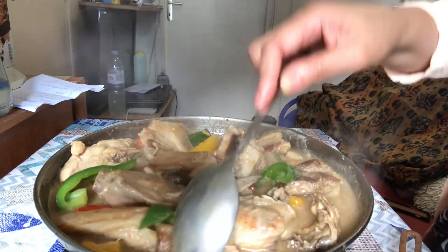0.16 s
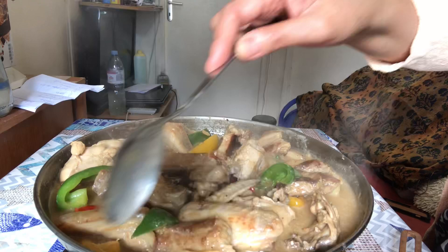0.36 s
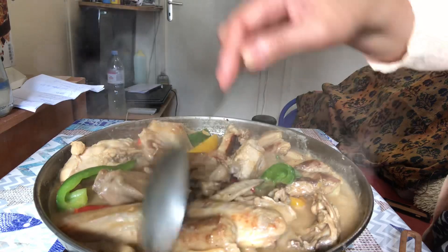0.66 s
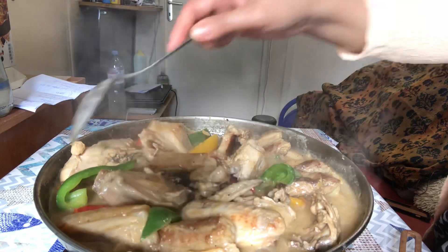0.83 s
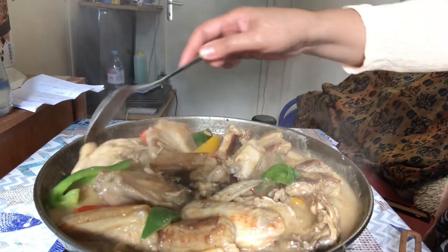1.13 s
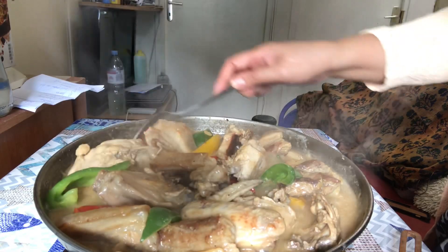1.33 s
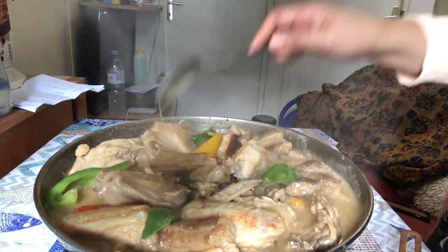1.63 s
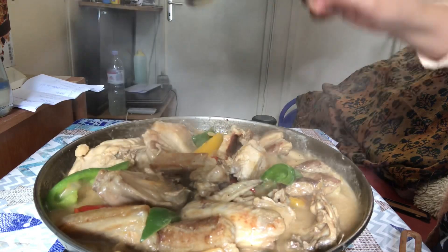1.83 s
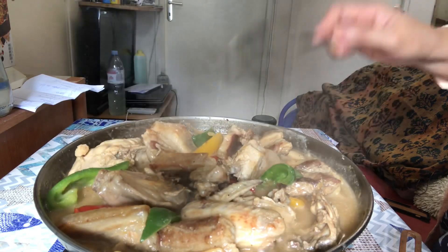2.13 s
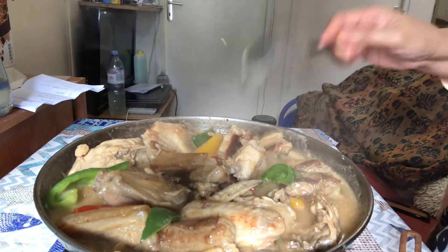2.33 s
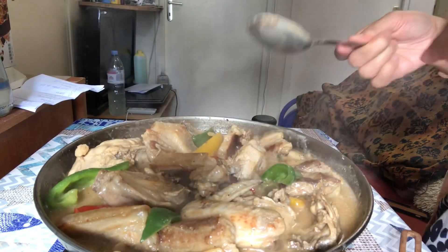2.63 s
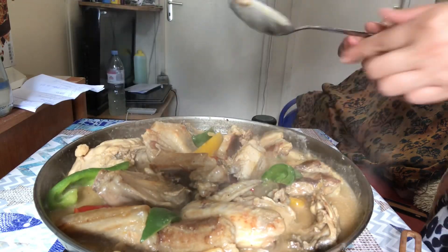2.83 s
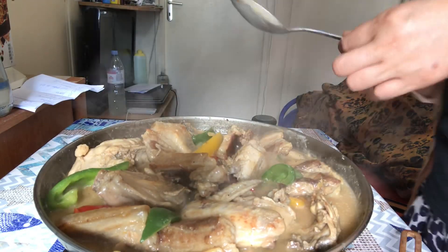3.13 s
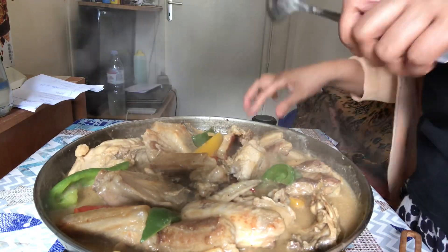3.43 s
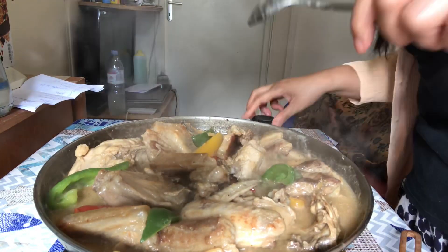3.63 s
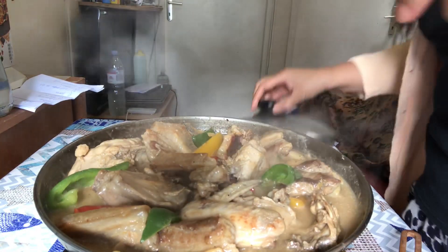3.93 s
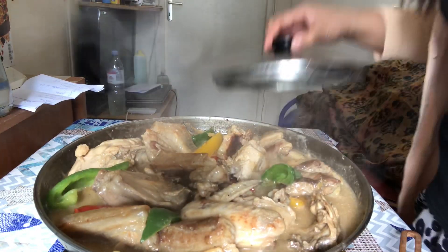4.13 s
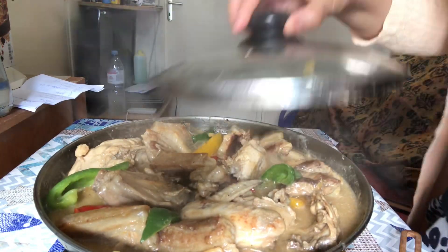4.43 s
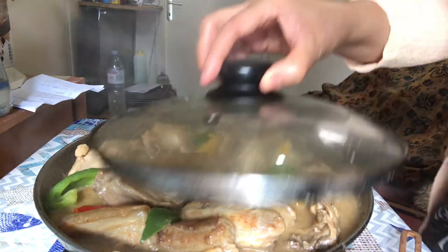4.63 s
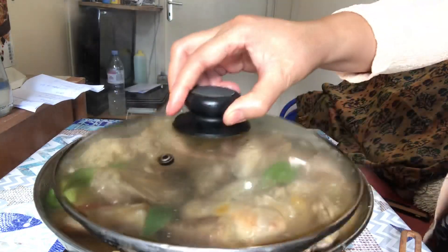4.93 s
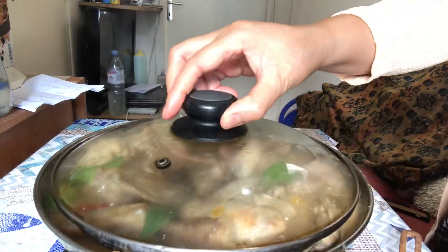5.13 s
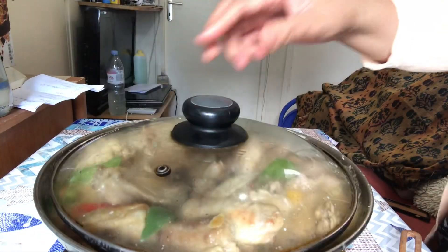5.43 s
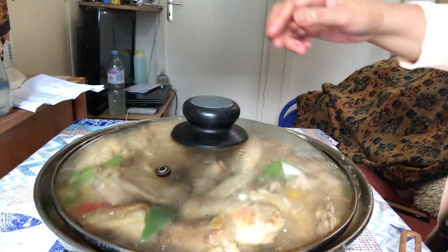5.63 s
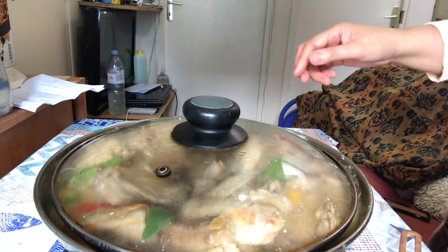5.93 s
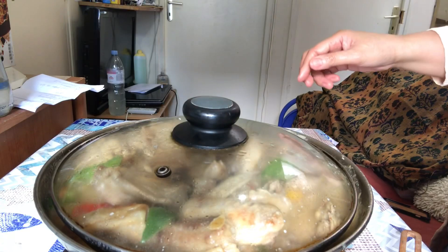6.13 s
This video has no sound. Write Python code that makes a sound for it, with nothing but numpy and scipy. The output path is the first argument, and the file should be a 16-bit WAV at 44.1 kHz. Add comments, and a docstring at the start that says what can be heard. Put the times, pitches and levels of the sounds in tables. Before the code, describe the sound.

Thick stew bubbles and pops close by in a wide metal pan; a spoon scrapes, a lid clanks on, and finally a spoon clatters down.

```python
"""Stew simmering under a lid

A stew simmers close by in a wide metal pan: short swells of tone pop over a low gurgle of resonated noise.
A spoon knocks and scrapes the rim: decaying sines, then noise rubbed through the rim modes.
A glass lid lands with a ring and a rattle; the air space under it resonates with the boil and sinks in pitch.
At the end the spoon drops on a table, ringing over a thud and a clatter. Faint room echo and hiss lie behind.
"""
import sys
import numpy as np
from scipy import signal
from scipy.fft import rfft, irfft
from scipy.io import wavfile
from scipy.ndimage import uniform_filter1d

SR = 44100
rng = np.random.default_rng(int(sys.argv[2]) if len(sys.argv) > 2 else 0)


def store_pcm(level_fs):
    """Save levels as 16-bit WAV."""
    pcm = np.round(np.clip(level_fs, -1, 1) * 32767).astype(np.int16)
    wavfile.write(sys.argv[1], SR, np.atleast_2d(pcm).T)


N = 276507

# clearest bubbles and ticks, among them a loud tick at 4.178 s, probably the lid being lifted: (time [s],
# nominal level [dB], nominal pitch [Hz])
POPS_AND_TICKS = [(0.0517, -34, 3130), (0.0564, -34, 11200), (0.0746, -31.5, 5700), (0.0856, -39, 9540),
                  (0.092, -40.5, 1100), (0.14, -38, 1130), (0.149, -26, 4030), (0.165, -34, 3280),
                  (0.2674, -34.5, 3700), (0.331, -39.5, 7650), (0.341, -38, 1200), (0.4187, -32.5, 3580),
                  (0.447, -36.5, 840), (0.4655, -31, 3370), (0.4963, -32, 5630), (0.5015, -26, 3660),
                  (0.5392, -26.5, 12260), (0.5703, -34, 3930), (0.595, -43.5, 1100), (0.633, -37, 3550),
                  (0.758, -39, 770), (0.7973, -28.5, 3370), (0.827, -35, 7440), (0.8566, -21, 4800),
                  (0.866, -26, 11550), (1.0196, -32, 3120), (1.108, -33.5, 2840), (1.116, -27.5, 3520),
                  (1.172, -27.5, 3340), (1.211, -36.5, 930), (1.319, -27.5, 4030), (1.546, -30, 5460),
                  (1.561, -40, 1070), (1.6205, -25, 5970), (1.636, -40.5, 517), (1.6771, -26, 3000),
                  (1.7287, -34, 3000), (1.742, -26.5, 3320), (1.7656, -34.5, 740), (1.7797, -26, 6800),
                  (1.8498, -28, 3530), (1.9105, -27.5, 6360), (1.926, -30, 5000), (2.0805, -34, 3920),
                  (2.096, -35, 13000), (2.113, -31, 6130), (2.1876, -33, 3120), (2.1991, -30, 7960),
                  (2.2448, -31.5, 5100), (2.406, -30.5, 3430), (2.418, -30.5, 5530), (2.4504, -29.5, 2900),
                  (2.4729, -35.5, 7850), (2.5246, -35, 11550), (2.544, -29.5, 3100), (2.7478, -33.5, 2850),
                  (2.8312, -29.5, 3040), (2.8316, -39, 13100), (2.84, -32, 2940), (2.9379, -43, 3450),
                  (2.9697, -35, 4950), (2.995, -31.5, 3450), (3.0588, -41, 5800), (3.1492, -36, 5950),
                  (3.1552, -32.5, 3800), (3.173, -30.5, 3500), (3.2738, -41, 8700), (3.5626, -33, 4000),
                  (3.611, -37, 3470), (3.673, -31, 2820), (3.8898, -36.5, 1080), (3.943, -30, 3280),
                  (3.9627, -34.5, 10890), (4.1108, -32, 3380), (4.158, -38, 4300), (4.178, -14.5, 3500),
                  (4.182, -21.5, 4400), (4.1974, -27, 2850), (4.221, -32, 4220), (4.2278, -29, 1870),
                  (4.319, -34, 3350), (4.4465, -34.5, 3240), (4.4914, -35, 7100), (4.5487, -33, 6300),
                  (4.5966, -30.5, 980), (4.656, -27, 3450), (4.8447, -29, 3200), (4.908, -29, 940),
                  (5.0382, -34, 2650), (5.1833, -43, 650), (5.1962, -37, 10100), (5.1985, -37, 620),
                  (5.2496, -35.5, 2260), (5.2912, -35.5, 5330), (5.365, -34, 2740), (5.4015, -40, 560),
                  (5.4657, -38, 905), (5.518, -38, 1240), (5.6359, -40, 8110), (5.6963, -39, 2080),
                  (5.81, -39, 2800), (6.05, -40, 1200)]
# vigour of the boil: (time [s], level [dB])
BOIL_VIGOUR = [(0, 3.5), (0.25, -2), (0.65, -1), (0.85, 1.5), (1.4, 1.5), (1.75, 1.5), (2.0, -1.5),
               (2.98, 2), (3.4, -1.5), (3.75, 1.5), (4.25, 1), (4.7, 2.5), (5.4, 0), (6.27, -3)]
# bright bubbles, size by pitch: (pitch [Hz], relative level [dB])
BRIGHT_SIZES = [(1500, -46), (2400, -1.5), (3400, 3.5), (5000, -6), (6700, -4.5), (9000, -37.5),
                (11000, -44), (13000, -39), (16000, -42)]
# fat bubbles: (pitch [Hz], relative level [dB])
FAT_SIZES = [(350, -51), (600, -1.5), (900, 2.5), (1250, -0.5), (1700, -6.5), (2300, -10.5)]
# sparse tiny droplets bursting: (pitch [Hz], relative level [dB])
DROPLET_SIZES = [(7000, -4), (10500, -2), (15000, -0.5)]
# pan floor under the boil: (frequency [Hz], width before broadening [Hz], relative level [dB])
PAN_FLOOR_MODES = [(240.8, 95.4, 4), (289.3, 29, -1), (161, 56, -11.5)]
# bright, fat, droplets, gurgle, rumble: (level [dB], share of vigour followed [1], change under the lid [dB])
BOIL_LAYERS = [(-54.5, 0.84, -1), (-56, 0.47, 0.4), (-68.5, 0.85, -7), (-56.5, 0.88, 1.8), (-63.5, 0.4, 1)]
# higher air modes under the lid: (frequency [Hz], width before broadening [Hz], level [dB])
LID_AIR_MODES = [(1203, 111, -4.5), (1835, 98, -8), (2250, 350, -17.5), (2800, 130, -18.5)]
# struck spoon: (frequency [Hz], level [dB], free t60 [s])
SPOON_MODES = [(2063, 5.5, 0.079), (2160, 2, 0.25), (2870, -11, 0.11), (3134, -1.5, 0.33), (3320, 6, 0.11),
               (3450, 3, 0.091), (3990, -35, 0.055), (4710, -4, 0.27), (5600, 2, 0.22), (5880, -3, 0.096),
               (6860, 2, 0.056), (7880, -8.5, 0.26), (8160, -7, 0.086), (8570, -17, 0.084),
               (10270, -1.5, 0.094), (11600, -1.5, 0.089), (13180, 8, 0.12), (13350, -16, .08),
               (14030, 4, 0.062), (15700, 5, 0.075)]
# (time [s], ring level [dB], tilt [dB/octave], share of free ring time [1], thud level [dB], clatter level [dB])
SPOON_HITS = [(1.2428, -42.5, 1.5, 0.26, -69, -26), (6.1765, -19.5, -1, 0.78, -29.5, -8),
              (6.1898, -35, -16, 0.45, -42, -22), (6.1985, -51, -10, 1, -36, -18.5)]
# table top: (frequency [Hz], level [dB], t60 [s])
TABLE_MODES = [(131, 4, 0.083), (195, -7, 0.2), (247, -5, 0.13), (326, -1, 0.13), (490, -3, 0.029),
               (770, -11, 0.11), (1124, -2, 0.076), (1500, -7, 0.022)]
# pan rim: (frequency [Hz], level [dB], t60 [s])
RIM_MODES = [(329, -5.5, .1), (459, -4.5, 0.17), (670, -6, 0.17), (922, -6.5, 0.17), (1388, -14.5, 0.26),
             (1800, -16, .15), (2890, -4, 0.1), (4460, -4, 0.059), (5200, -13, 0.17), (6160, -6.5, 0.048)]
# knock on the rim: (time [s], level [dB])
RIM_KNOCK = (1.2435, -25.5)
# spoon strokes along the rim: (start [s], length [s], level [dB], level change over the stroke [dB])
RIM_STROKES = [(1.254, 0.14, -37, -11.5), (1.4, 0.1, -45, 0)]
# spoon handle held in the fingers: (frequency [Hz], level [dB], t60 [s])
HANDLE_MODES = [(3330, 5.5, 0.15), (3670, -2, 0.08), (4450, 1, 0.07), (6500, -8, 0.05), (9300, -4, 0.12),
                (12700, 4, 0.03), (14500, 3, 0.04)]
# light clink: (time [s], ring level [dB], clatter level [dB])
HANDLE_CLINK = (3.0922, -43.5, -44.5)
# steel rattling on a hard face: (frequency [Hz], relative level [dB])
CLATTER_COLOUR = [(200, -44), (600, -5), (1300, -15), (2100, -3), (5400, 0), (7500, -3), (9800, -4),
                  (13000, -15), (16000, -27)]
# glass lid on the pan: (frequency [Hz], level [dB], t60 [s])
LID_MODES = [(54.7, -21, 0.18), (137, -16, 0.14), (322.6, -3, 0.11), (570, -7.5, 0.036), (658, 2.5, 0.05),
             (773, -3, 0.054), (1130, -8, 0.1), (1460, -16, 0.036), (1800, 10.5, 0.01), (2240, -2, 0.021),
             (2740, 0, 0.01), (3370, -0.5, 0.018), (4050, -9, 0.047)]
# lid contacts: (time [s], ring level [dB], rattle level [dB])
LID_HITS = [(4.7455, -13, -13.5), (4.747, -20.5, -19.5), (4.791, -40, -42)]
# lid band rattling on the rim: (frequency [Hz], relative level [dB])
BAND_COLOUR = [(40, -30), (130, -13), (400, -4), (800, -6.5), (1850, 0.5), (2500, -10), (4000, -19),
               (6500, -18.5), (9000, -34), (16000, -36)]
# room decay: (frequency [Hz], t60 [s])
ROOM_DECAY = [(100, 0.33), (700, 0.17), (2000, 0.25), (5000, 0.21), (12000, 0.3)]
# room and microphone hiss: (frequency [Hz], relative density [dB])
HISS_COLOUR = [(30, -21), (200, -14), (1000, -17), (4000, -17.5), (8000, -39), (11000, -77), (16000, -81)]
# microphone response: (frequency [Hz], gain [dB])
MIC_RESPONSE = [(30, 2.5), (7000, 0), (9000, -2), (10500, -6.5), (12000, -6.5), (16000, -10)]

# cycles of a 3 kHz pop at -32 dB; higher pops ring more cycles, harder ones fewer
POP_CYCLES, PITCH_POWER, HALVING_DB = 2.83, 0.23, 19
RUMBLE_SWELL_DB = 1.1
LID_NEAR_S, LID_SHUT_S = 4.42, 4.7
# lowest air mode when shut; it sinks as steam fills the space
LID_MODE_HZ, SINK_HZ_PER_S, SETTLED_HZ = 667, 140, 496
SCRAPE_HISS_DB, TOUCH_S = -4.5, 0.006  # bare hiss of the slips; time to touch and to let go
SQUEAK_HZ, SQUEAK_SAG_HZ_PER_S, SQUEAK_DB = 3310, 5000, -0.5
SPOON_LOW_HZ = 110  # a small object moves little air below this
CONTACT_S = 0.00026  # build-up of a blow
AIR_DB = -69.5
EDGE_HZ = 16250


def boil():
    """Bubbles, droplets, gurgle and rumble; rising steam swells bright, fat and gurgle layers together."""
    heave = drift(55.0)
    bright_clumps_db = 3.4 * drift(22.0) + 1.2 * heave
    bright = swarm(BRIGHT_SIZES, per_s=750, spread_db=4.5, cycles=2.56, clumps_db=bright_clumps_db, count=200)
    fat = swarm(FAT_SIZES, per_s=600, spread_db=4.0, cycles=1.53, clumps_db=2.7 * heave, count=100)
    droplets = swarm(DROPLET_SIZES, per_s=45, spread_db=3.0, cycles=1.9, clumps_db=2.8 * drift(8.0), count=30)
    lumps = rng.standard_normal(N) * gain_of(2.6 * heave)
    gurgle = resonate_modes(lumps, PAN_FLOOR_MODES, broadening=1.31)
    rumble = resonate(resonate(rng.standard_normal(N), 58, 28), 62.4, 36)
    rumble = rumble * gain_of(RUMBLE_SWELL_DB * drift(6.0))
    layers = bright, fat, droplets, evened(gurgle), evened(rumble)
    vigour_db, closed = curve(BOIL_VIGOUR, order=1), lid_closed()
    out = np.zeros(N)
    for (db, share, lid_db), layer in zip(BOIL_LAYERS, layers):
        out += gain_of(db + share * vigour_db + lid_db * closed) * layer
    return out


def swarm(sizes, per_s, spread_db, cycles, clumps_db, count):
    """Random bubbles of many pitches, in clumps, with exponentially spread levels; rms 1."""
    at = np.flatnonzero(rng.random(N) < per_s * gain_of(clumps_db) / SR)
    size = gain_of(spread_db * np.minimum(rng.exponential(1, N), 3.0))
    kind = rng.integers(0, count, N)
    shapes = []
    for hz in np.geomspace(sizes[0][0], sizes[-1][0], count):
        shape = bubble(hz, cycles * rng.uniform(0.3, 2.8))
        shape = shape / np.linalg.norm(shape)
        shapes.append(gain_of(read(sizes, hz)) * shape * np.sqrt(hz))
    out = np.zeros(N)
    for n in at:
        add(out, n / SR, size[n] * shapes[kind[n]])
    return evened(out)


def pops_and_ticks():
    """Clear bubbles and ticks, started early so that each swell crests near its listed time."""
    out = np.zeros(N)
    for s, db, hz in POPS_AND_TICKS:
        cycles = POP_CYCLES * (hz / 3000) ** PITCH_POWER * 2 ** (-(db + 32) / HALVING_DB)
        add(out, s - cycles / (3.2 * hz), gain_of(db) * bubble(hz, cycles))
    return out


def bubble(hz, cycles):
    """A short swell of tone and the snap of the film, thrown back at once by food and pan walls."""
    t = np.arange(500) / SR
    u = t * hz * 3.645 / cycles  # the swell crests at u = 1
    glide = rng.uniform(-0.01, 0.025)
    tone = u * np.exp(1 - u) * np.sin(2 * np.pi * cycles / 3.71 * u * (1 + glide * u))
    snap = 0.33 * rng.standard_normal(500) * u * np.exp(1 - 1.55 * u)
    echoes = rng.standard_normal(500) * (rng.random(500) < 0.06)
    echoes *= gain_of(-60 * t / 0.014) * (t > 0.0006)
    echoes *= gain_of(-6.0) / (np.linalg.norm(echoes) + 1e-9)
    echoes[0] = 1  # direct sound
    return np.convolve(tone + snap, echoes)


def lid_space(x):
    """Air trapped under the lid rings with the boil; the glass holds back part of the middle band."""
    closed = lid_closed()
    since_shut_s = np.arange(N) / SR - LID_SHUT_S
    lowest_hz = np.maximum(LID_MODE_HZ - SINK_HZ_PER_S * since_shut_s, SETTLED_HZ)
    # the whole surface seethes, heard only through the modes
    seethe = gain_of(-40.5) * rng.standard_normal(N) * gain_of(5.0 * drift(134.0))
    drive = seethe + gain_of(5.5) * x
    rung = gain_of(2.5) * resonate(drive, lowest_hz, 59)
    rung += resonate_modes(drive, LID_AIR_MODES, broadening=2.55)
    middle = signal.butter(2, [420, 3600], "band", fs=SR, output="sos")
    held = signal.sosfiltfilt(middle, x)
    return x + closed * (rung - 0.6 * held)


def lid_closed():
    """Lid position: 0 for the open pan, rising linearly to 1 when shut."""
    return np.clip((np.arange(N) / SR - LID_NEAR_S) / (LID_SHUT_S - LID_NEAR_S), 0, 1)


def spoon():
    """Spoon blows, rim knock, clink and scrape, with the lows removed."""
    low_cut = signal.butter(2, SPOON_LOW_HZ, "high", fs=SR, output="sos")
    return signal.sosfilt(low_cut, spoon_knocks() + rim_scrape())


def spoon_knocks():
    """Struck modes of spoon, table, rim and handle, with noise for the clatter of steel."""
    out = np.zeros(N)
    for s, db, tilt_db, free, thud_db, clatter_db in SPOON_HITS:
        clatter = rattle(CLATTER_COLOUR, 0.034, 0.17 * free, -21.5)
        blow = gain_of(db) * ring(SPOON_MODES, tilt_db, free, rough=0.8)
        blow += gain_of(thud_db) * ring(TABLE_MODES)
        blow += gain_of(clatter_db) * clatter
        add(out, s, blow)
    knock_s, knock_db = RIM_KNOCK
    add(out, knock_s, gain_of(knock_db) * ring(RIM_MODES))
    clink_s, clink_db, clatter_db = HANDLE_CLINK
    clink = gain_of(clink_db) * ring(HANDLE_MODES, rough=0.83)
    clink += gain_of(clatter_db) * rattle(CLATTER_COLOUR, 0.03, 0.1, -13)
    add(out, clink_s, clink)
    return out


def rim_scrape():
    """Random slips excite the damped rim, hiss, and sing faintly, lower as the last stroke slows."""
    t = np.arange(N) / SR
    slips = rng.standard_normal(N) * gain_of(3.6 * drift(170.0))
    rim = signal.oaconvolve(slips, ring(RIM_MODES, 2.7, 0.08))[:N]
    hiss = np.diff(slips, prepend=0) + 0.45 * slips
    squeak_hz = SQUEAK_HZ - SQUEAK_SAG_HZ_PER_S * (t - RIM_STROKES[-1][0])
    squeak = resonate(slips, np.clip(squeak_hz, 500, SQUEAK_HZ), 230)
    rubbed = evened(rim) + gain_of(SCRAPE_HISS_DB) * evened(hiss) + gain_of(SQUEAK_DB) * evened(squeak)
    pressure = np.zeros(N)
    for s, length, db, fade_db in RIM_STROKES:
        touch = np.clip(np.minimum(t - s, s + length - t) / TOUCH_S, 0, 1)
        pressure += gain_of(db + fade_db * (t - s).clip(0, length) / length) * touch
    return evened(rubbed) * pressure


def lid_landing():
    """The steel band of the lid meets the pan, one edge then the other, and settles."""
    out = np.zeros(N)
    for s, db, rattle_db in LID_HITS:
        band = rattle(BAND_COLOUR, 0.031, 0.23, -21.5)
        add(out, s, gain_of(db) * ring(LID_MODES) + gain_of(rattle_db) * band)
    return out


def ring(modes, tilt_db=0, free=1, rough=0.7):
    """A struck body: decaying sines that soon waver, as loose contact keeps disturbing them."""
    t = np.arange(SR // 3) / SR
    out = np.zeros(len(t))
    share = np.clip(rough, 0, 1) * (1 - np.exp(-t / 0.0022))
    for hz, db, t60 in modes:
        smooth_s = min(9.0 / hz + 0.0014, 0.03)
        a, b = uniform_filter1d(rng.standard_normal((2, len(t))), int(SR * smooth_s))
        chance = (evened(a) + 1j * evened(b)) / np.sqrt(2)
        waver = rng.choice([-1, 1]) * (1 - share) + share * chance
        level_db = db + tilt_db * np.log2(hz / 3000) - 60 * t / (t60 * free)
        out += gain_of(level_db) * (waver * np.exp(2j * np.pi * hz * t)).imag
    return out * np.minimum(t / CONTACT_S, 1)


def rattle(colour, crack_t60, tail_t60, tail_db):
    """Coloured noise: a hard crack, then a longer grainy tail."""
    t = np.arange(SR // 3) / SR
    grain = evened(uniform_filter1d(rng.standard_normal(len(t)), 90))
    grit = rng.standard_normal(len(t)) * gain_of(2.4 * grain)
    noise = evened(coloured(grit, colour))
    decay = gain_of(-60 * t / crack_t60) + gain_of(tail_db - 60 * t / tail_t60)
    return noise * decay * np.minimum(t / 0.0012, 1)


def room(x):
    """Sparse taps of random sign, one in every 20 samples, each band dying at its own speed."""
    taps = np.zeros(SR // 2)
    at = np.arange(100, SR // 2 - 20, 20)
    taps[at + rng.integers(0, 20, len(at))] = rng.choice([-1.0, 1.0], len(at))
    hz, t, z = signal.stft(taps, SR, nperseg=256)
    z = z * gain_of(-60 * t / read(ROOM_DECAY, hz)[:, None])
    tail = signal.istft(z, SR, nperseg=256)[1]
    return signal.fftconvolve(x, tail / np.linalg.norm(tail))[:N]


def air():
    """Steady coloured noise: room and microphone hiss."""
    return gain_of(AIR_DB) * evened(coloured(rng.standard_normal(N), HISS_COLOUR))


def resonate(x, hz, width):
    """Shifts hz down to zero, smooths, and shifts back: a resonance of gain 1."""
    turn = np.exp(2j * np.pi * np.cumsum(hz * np.ones(len(x))) / SR)
    r = np.exp(-np.pi * width / SR)
    return 2 * (turn * signal.lfilter([1 - r], [1, -r], x / turn)).real


def resonate_modes(x, modes, broadening):
    """Sum of resonances, each passed twice at its broadened width."""
    out = np.zeros(len(x))
    for hz, width, db in modes:
        once = resonate(x, hz, broadening * width)
        out += gain_of(db) * resonate(once, hz, broadening * width)
    return out


def coloured(x, spectrum):
    """Weights x by a spectrum table."""
    return irfft(rfft(x) * gain_of(read(spectrum, np.fft.rfftfreq(x.shape[-1], 1 / SR))), x.shape[-1])


def drift(hz):
    """Smoothed noise of rms 1, mostly slower than hz."""
    width = int(SR / hz)
    return evened(uniform_filter1d(uniform_filter1d(rng.standard_normal(N), width), width))


def gain_of(db):
    """Decibels to a factor."""
    return 10 ** (np.asarray(db) / 20)


def evened(x):
    """Scaled to rms 1."""
    return x / np.sqrt(np.mean(x ** 2) + 1e-20)


def read(points, hz):
    """A spectrum table at any frequency, interpolated over log frequency."""
    f, value = np.transpose(points)
    return np.interp(np.log(hz + 1), np.log(f + 1), value)


def curve(rows, order):
    """One column of a time table at every sample."""
    rows = np.array(rows)
    return np.interp(np.arange(N) / SR, rows[:, 0], rows[:, order])


def add(mix, s, sound):
    """Mixes a sound in at time s."""
    part = mix[round(s * SR):][:len(sound)]
    part += sound[:len(part)]


def scene():
    """Pan and knocks heard directly, with a quieter share of each through the room, and hiss."""
    pan = lid_space(boil() + pops_and_ticks())
    knocks = spoon() + lid_landing()
    echo = room(gain_of(-13.5) * pan + gain_of(-14.5) * knocks)
    return (pan + knocks + echo + air())[None]


def record(dry):
    """Microphone colour, bass roll-off, then the band limit."""
    x = coloured(dry, MIC_RESPONSE)
    x = signal.sosfilt(signal.butter(3, 42, "high", fs=SR, output="sos"), x)
    band_limit = signal.firwin(511, EDGE_HZ, window=("kaiser", 9), fs=SR)
    return signal.oaconvolve(x, band_limit[None], "same")


dry = scene()
out = record(dry)
store_pcm(out)
```